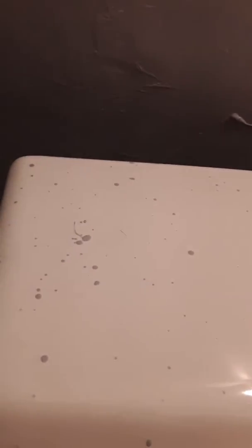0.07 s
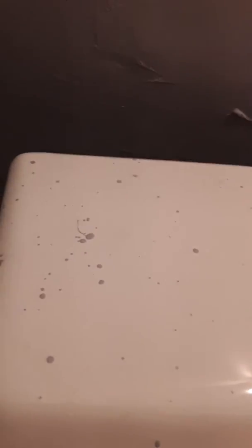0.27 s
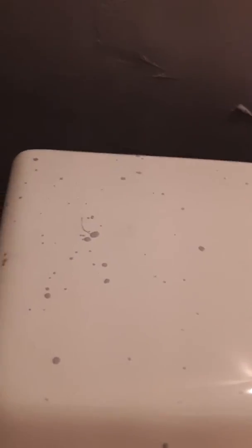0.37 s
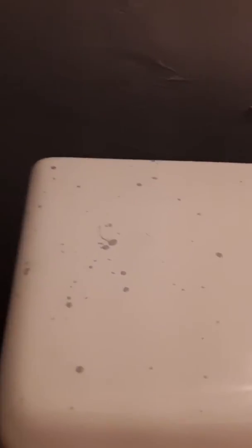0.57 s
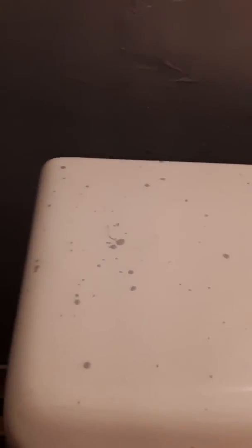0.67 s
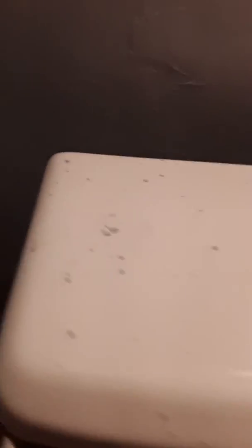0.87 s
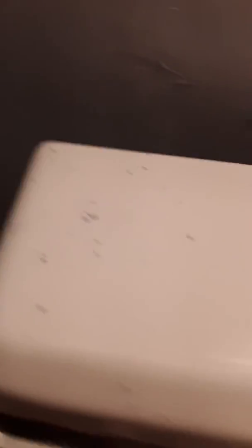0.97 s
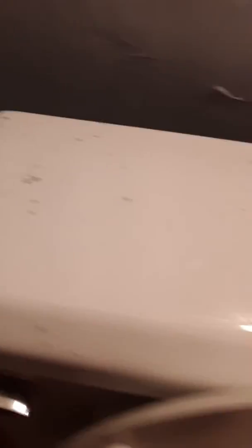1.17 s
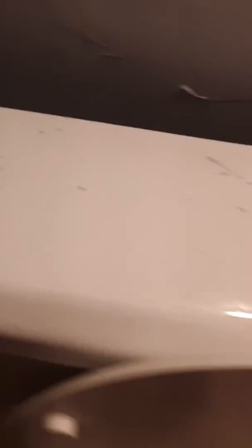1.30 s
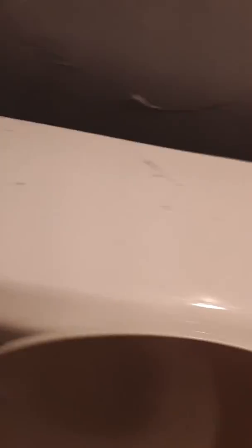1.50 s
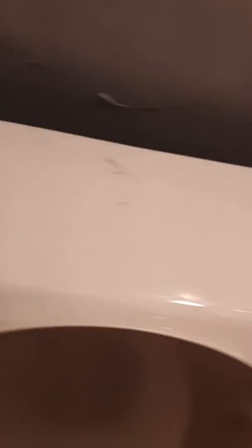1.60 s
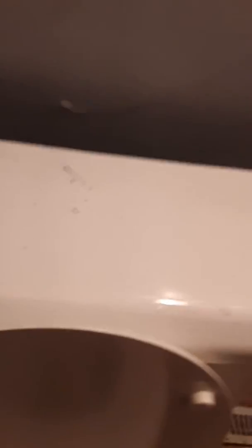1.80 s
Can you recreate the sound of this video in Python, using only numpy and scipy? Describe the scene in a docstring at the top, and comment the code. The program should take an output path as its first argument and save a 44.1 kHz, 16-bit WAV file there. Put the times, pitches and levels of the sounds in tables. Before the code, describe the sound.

A toilet cistern clacks close by in a small, quiet, hard-walled room. After soft microphone bumps at the start, a plastic part chatters at about 0.25 seconds and seats at 0.3, briefly ringing the shell. More handling bumps and rustles follow. A sharp, pinging tick, perhaps a drip, comes at 0.8 seconds, then fainter ticks until 1.4. Faint room tone and hiss last to nearly 2 seconds.

```python
"""A toilet cistern, close to the microphone in a small, quiet, hard-walled room: a plastic part
chatters and clacks home, ringing the shell. Two faint soft onsets come just ahead of the chatter.
A few sharp ticks follow, perhaps drips, each with a short ping and a tail from the room.
The hand that carries the microphone bumps, rustles and rubs over faint room tone and hiss."""
import sys
import numpy as np
from scipy import signal
from scipy.fft import rfft, irfft
from scipy.io import wavfile

SR = 44100
rng = np.random.default_rng(int(sys.argv[2]) if len(sys.argv) > 2 else 0)


def transcribe(u):
    """Save the signal u as a 16-bit wav file named by the first command-line argument.

    u: samples, shape (n,) or (channels, n), limited to [-1, 1]; the rate is SR.
    q: integer samples, one column per channel.
    """
    v = np.clip(np.atleast_2d(u).T, -1, 1)
    q = np.round(v * 32767).astype(np.int16)
    wavfile.write(sys.argv[1], SR, q)


N = 81585

# spectra of the room tone and of the microphone's own hiss: f/Hz, level/dB
ROOM_TONE_COLOUR = [(25, -18), (60, -5), (122, 4.5), (200, -9), (330, -15), (445, -5), (570, -17.5),
                    (900, -21.5), (1300, -21), (1650, -15.5), (1920, -6.5), (2300, -25.5), (2850, -9),
                    (3150, -22.5), (4100, -25.5), (5500, -21), (7200, -18.5), (10600, -32), (15500, -25)]
MIC_HISS_COLOUR = [(500, 0), (4000, -0.5), (7500, -1.5), (10500, -2), (15500, -2)]
# course of the room tone: t/s, level/dB
ROOM_TONE_LEVEL = [(0, -61.5), (0.601, -62), (1.0, -65), (1.3, -70.5), (1.55, -66), (1.7, -67), (1.78, -73),
                   (1.85, -72)]
# hand rustles at the microphone: t/s, attack/s, t60/s, body level/dB, treble level/dB
HAND_RUSTLES = [(0.0, 0.0015, 0.29, -50, -60), (0.41, .015, 0.14, -54.5, -71),
                (0.477, 0.012, 0.15, -62.5, -85), (0.673, 0.011, 0.4, -57, -56.5),
                (0.879, 0.017, 0.39, -55.5, -59), (1.361, 0.013, 0.69, -66.5, -70)]
# spectra of a rustle's body and treble: f/Hz, level/dB
RUSTLE_BODY_COLOUR = [(100, -5.5), (250, -5.5), (450, 2), (600, -4), (1000, -10), (1900, -5), (3000, -18.5),
                      (6000, -37.5)]
RUSTLE_TREBLE_COLOUR = [(1200, -21), (2500, 2), (4200, -1), (5200, -3), (7000, -2.5), (10000, -16.5),
                        (15000, -14)]
# hand bumps on the microphone: t/s, f/Hz, level/dB, t60/s, relative thud level/dB
HAND_BUMPS = [(0.001, 142.7, -38.5, 0.21, -5), (0.040, 223.7, -44.5, 0.11, 0),
              (0.064, 99, -48.5, 0.14, -2.5), (0.336, 155, -52.5, 0.25, 1.5),
              (0.412, 195.6, -44.5, 0.18, -1), (0.424, 211.6, -40.5, 0.13, -3.5),
              (0.482, 439, -54, 0.15, 1), (0.528, 151.8, -48, 0.19, -6), (0.590, 154, -46, 0.13, -11.5),
              (0.620, 213.3, -54.5, 0.27, -6), (0.680, 145, -53, 0.13, -5), (0.709, 149, -52.5, 0.24, -5)]
# spectrum of a bump's thud: f/Hz, level/dB
BUMP_THUD_COLOUR = [(30, -34), (55, -30), (85, -5), (150, -3.5), (330, -6), (480, -13.5), (700, -26),
                    (1800, -39.5), (4000, -59)]
# two faint soft onsets just ahead of the chatter, then the part's contacts from 0.2404 s on:
# t/s, relative levels of knock/dB, ring and scatter/dB, crack/dB, place (0 rim, 1 seated)
CLACK_ONSETS = [(0.22, -30, -31, -41, 0), (0.2326, -32, -25, -29.5, 0), (0.2404, -6.5, -10.5, -8.5, 0.0078),
                (0.2456, -2.5, -5, -7, 0.051), (0.2488, -9, -6.5, -8, 0), (0.2512, -6.5, -5, -5.5, 0),
                (0.2577, -9.5, -17.5, -15.5, 0.067), (0.2661, -5, -9, -7.5, 0), (0.2756, -11, -22.5, -8, 0),
                (0.292, -22.5, -26, -2, 1), (0.2984, 1.5, 2, -1, 0.96), (0.3015, -15, -14, -6.5, 1),
                (0.306, -9.5, -11.5, -10, 1)]
# modes of the shell and the space inside: f/Hz, level struck at rim/dB, level struck seated/dB, t60/s
SHELL_MODES = [(217.5, -9.5, -13.5, 0.29), (231.7, -8, -21.5, 0.25), (322.8, -26.5, -15, 0.24),
               (361, -25.5, -17, .3), (389.6, -17, -21.5, .25), (518.7, -18.5, -20, .2),
               (587, -17.5, -23, 0.22), (719, -14.5, -26.5, 0.24), (1027, -10, -24.5, .15),
               (1135.7, -11, 1.5, 0.25), (1231.4, -6, -6.5, 0.24), (1303, -17, -15, .3),
               (1343, -12.5, -18.5, .2), (1451, -12.5, -13.5, 0.14), (1563, -1.5, -4.5, .2),
               (1612, -4.5, -11, .18), (1680, -14, -10.5, 0.22), (1795, -3.5, -11, 0.14),
               (1860, -7, -7.5, .17), (2078, -17.5, -14, .2), (2780, -21, -22, 0.23)]
# spectra of the clack's scattered knock and bright crack: f/Hz, level/dB
SCATTER_COLOUR = [(70, -39.5), (150, -21), (220, -19), (380, -20.5), (600, -21.5), (900, -28), (1150, -5),
                  (1400, -6), (1600, 0), (1850, -1), (2300, -26.5), (4000, -45)]
BRIGHT_CRACK_COLOUR = [(800, -18), (2400, 0), (4400, 0.5), (5000, -8.5), (6100, 1), (7600, -4.5),
                       (8500, -10), (12500, -10), (15000, -14)]
# ticks: t/s, level/dB, left minus right/dB, relative room level/dB, cutoff/Hz,
# pings as (f/Hz, relative level/dB, t60/s)
SHARP_TICKS = [(0.8153, -34.5, -5.5, -8, 13000, [(1875, -18, 0.077), (3413, -16.5, 0.12),
               (4200, -14, 0.093), (6550, -10.5, .05), (7200, -8.5, .05), (7730, -6, 0.034)]),
               (1.0247, -57.5, 0, -24, 7070, [(3020, -5, .02)]),
               (1.1595, -50.5, 1.5, -13.5, 7600, [(3180, -3, 0.027), (4200, -5, 0.015), (5420, -0.5, .016),
               (6230, -4.5, 0.025), (6960, -3.5, .022)]), (1.227, -61, 2.5, -6, 6920, [(4520, -2, .02)]),
               (1.4180, -56, -4.5, -6, 7240, [(3100, -6, 0.027), (4610, 0, 0.029), (6060, -1.5, .02),
               (6530, -4, .02)]), (0.496, -68, 6.5, -28, 11820, [(8780, 4.5, .02)]),
               (0.5359, -60, 14, -21, 5970, [(3690, -6.5, .02)])]
# spectrum of a tick's splat ahead of its low-pass: f/Hz, level/dB
SPLAT_COLOUR = [(300, -23.5), (1000, -10.5), (1900, -6), (2700, -10), (3400, -0.5), (3800, -3.5),
                (4250, 0.5), (4700, -6.5), (5200, -4), (6300, -2), (7700, 1), (9500, -5), (15000, -3)]
# hand rubs on the microphone: t/s, length/s, level/dB
HAND_RUBS = [(0.668, 0.069, -66), (0.904, 0.062, -61), (1.343, 0.066, -63.5), (1.408, 0.067, -61),
             (1.611, 0.076, -67)]
# hollow spectrum of a rub: f/Hz, level/dB
HOLLOW_COLOUR = [(200, -53), (350, -12.5), (410, -6), (445, 15), (490, -37), (600, -23), (800, -34),
                 (880, -12), (980, -43), (1200, -36)]


def undb(db):
    """Decibels to amplitude."""
    return 10 ** (np.asarray(db) / 20)


def since(start):
    """Seconds since start, zero before it."""
    return np.maximum(np.arange(N) / SR - start, 0)


def envelope(start, attack, t60, hold=0):
    """Linear attack, hold, exponential release; all times in seconds."""
    t = since(start)
    return np.minimum(t / attack, 1) * np.exp(-np.log(1000) * np.maximum(t - attack - hold, 0) / t60)


def noise(colour, alike_hz=700, least_side=0.396):
    """Stereo noise of rms 1 with the given spectrum; left and right are more alike below alike_hz."""
    f = np.maximum(np.arange(N // 2 + 1) * SR / N, 1)
    hz, db = np.array(colour, float).T
    gain = undb(np.interp(np.log(f), np.log(hz), db))
    mid, side = rfft(rng.standard_normal((2, N)))
    width = np.maximum(f / np.hypot(f, alike_hz), least_side) * np.array([[1], [-1]])
    x = irfft(gain * (mid + width * side), N)
    return x / np.sqrt(np.mean(x ** 2))


def room_tone_and_hiss(mic_hiss_db=-74.5):
    """Low room rumble and hum of air, sinking towards the end, over the microphone's even hiss."""
    level_db = np.interp(since(0), *np.array(ROOM_TONE_LEVEL).T)
    room_tone = undb(level_db) * noise(ROOM_TONE_COLOUR, alike_hz=499.5)
    return room_tone + undb(mic_hiss_db) * noise(MIC_HISS_COLOUR)


def hand_rustles():
    """The hand brushes the microphone: noise that starts quickly and dies away."""
    out = 0
    for start, attack, t60, body_db, treble_db in HAND_RUSTLES:
        body = undb(body_db) * noise(RUSTLE_BODY_COLOUR)
        treble = undb(treble_db) * noise(RUSTLE_TREBLE_COLOUR)
        out += envelope(start, attack, t60) * (body + treble)
    return out


def hand_bumps():
    """Soft blows right at the microphone, each one damped low resonance and a dull thud."""
    out = 0
    for start, hz, db, t60, thud_db in HAND_BUMPS:
        resonance = np.sin(2 * np.pi * hz * since(start))
        thud = undb(thud_db) * noise(BUMP_THUD_COLOUR, alike_hz=885)
        out += undb(db) * envelope(start, attack=0.004, t60=t60) * (resonance + thud)
    return out


def panel_knock(start, hz=1632, peak_s=0.0014, right_lag_s=0.0001):
    """A few cycles of the stiff plastic panel, reaching the microphone's left port first."""
    t = np.array([since(start), since(start + right_lag_s)])
    age = t / peak_s
    return age ** 2 * np.exp(2 * (1 - age)) * np.sin(2 * np.pi * hz * t)


def shell_ring(start, place, swell_cycles=4.3, right_lag_s=0.00022):
    """The shell's modes swell within a few cycles and ring on; the place struck sets their mix."""
    end = round(start * SR) + SR // 2
    t = np.array([since(start), since(start + right_lag_s)])[:, :end]
    ring = 0
    for hz, rim_db, seated_db, t60 in SHELL_MODES:
        gain = undb(rim_db + place * (seated_db - rim_db))
        swell = np.minimum(t * hz / swell_cycles, 1)
        decay = np.exp(-np.log(1000) * t / t60)
        ring += gain * swell * decay * np.sin(2 * np.pi * hz * t)
    return np.pad(ring, ((0, 0), (0, N - end)))


def cistern_clack():
    """Two faint soft onsets, then the close chatter: knocks, cracks, shell ring and scatter off walls."""
    out = 0
    for start, knock_db, ring_db, crack_db, place in CLACK_ONSETS:
        knock = undb(-12) * panel_knock(start)
        ring = undb(-25) * shell_ring(start, place)
        near_walls = undb(-23.5) * envelope(start, attack=0.003, t60=0.0838)
        room_tail = undb(-39.5) * envelope(start, attack=0.017, t60=0.3104)
        scatter = (near_walls + room_tail) * noise(SCATTER_COLOUR, alike_hz=450)
        crack_direct = undb(-28) * envelope(start, attack=0.00023, t60=0.02)
        crack_tail = undb(-35) * envelope(start, attack=0.004, t60=0.2)
        crack = (crack_direct + crack_tail) * noise(BRIGHT_CRACK_COLOUR)
        out += undb(knock_db) * knock + undb(ring_db) * (ring + scatter) + undb(crack_db) * crack
    return out


def ticks():
    """Perhaps drips: each a bright splat of a few milliseconds, one or more pings and a room tail."""
    out = 0
    for start, db, pan_db, room_db, cutoff_hz, pings in SHARP_TICKS:
        pan = undb(np.array([[pan_db], [-pan_db]]) / 2)
        direct = pan * envelope(start, attack=0.00033, t60=0.0074, hold=0.0028)
        room_tail = undb(room_db) * envelope(start, attack=0.0051, t60=0.23)
        late_tail = undb(-25) * envelope(start, attack=0.015, t60=2.03)
        low_pass = signal.butter(2, cutoff_hz, fs=SR, output="sos")
        splat = np.hypot(direct, room_tail + late_tail) * signal.sosfilt(low_pass, noise(SPLAT_COLOUR))
        ring = 0
        for hz, ping_db, t60 in pings:
            tone = np.sin(2 * np.pi * hz * since(start))
            ring += undb(ping_db) * envelope(start, attack=0.00099, t60=t60) * tone
        out += undb(db) * (splat + pan * ring)
    return out


def hand_rubs():
    """Light friction of the hand on the microphone swells in one hollow resonance."""
    swell = 0
    for start, length, db in HAND_RUBS:
        progress = np.minimum(since(start) / length, 1)
        swell += undb(db) * np.sqrt(np.abs(np.sin(np.pi * progress)))
    return swell * noise(HOLLOW_COLOUR)


def scene():
    """Room, hand and cistern as heard from the microphone's place."""
    return room_tone_and_hiss() + hand_rustles() + hand_bumps() + cistern_clack() + ticks() + hand_rubs()


def record(dry, low_cut_hz=70, top_hz=15900):
    """The hand-held microphone thins the deep bass and cuts the top."""
    low_cut = signal.butter(2, low_cut_hz, "high", fs=SR, output="sos")
    top_cut = signal.ellip(10, 0.2, 80, top_hz, fs=SR, output="sos")
    return signal.sosfilt(top_cut, signal.sosfilt(low_cut, dry))


dry = scene()
out = record(dry)
transcribe(out)
```